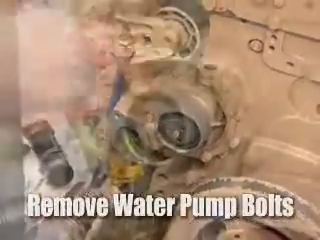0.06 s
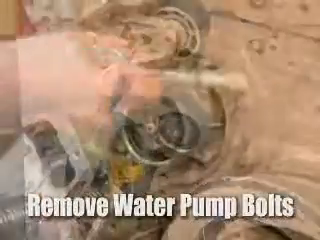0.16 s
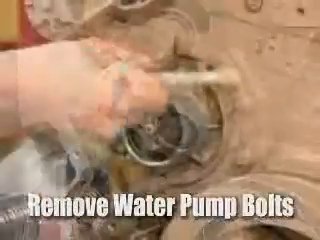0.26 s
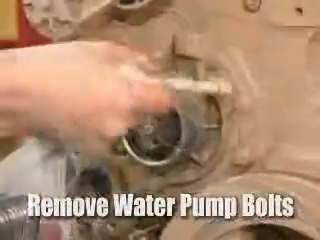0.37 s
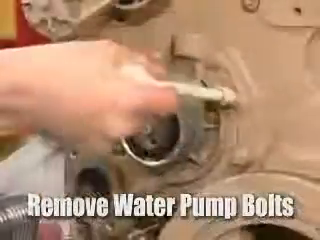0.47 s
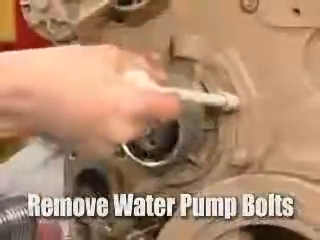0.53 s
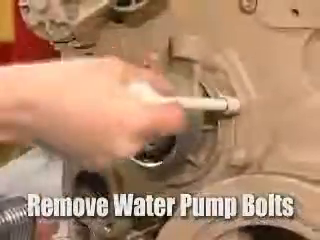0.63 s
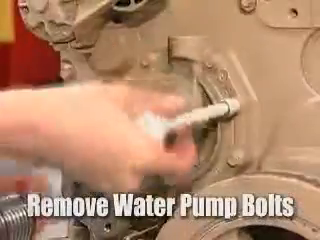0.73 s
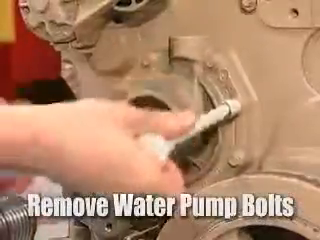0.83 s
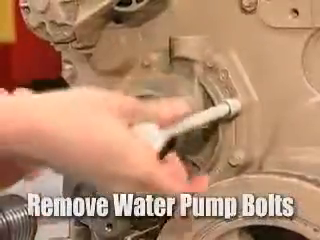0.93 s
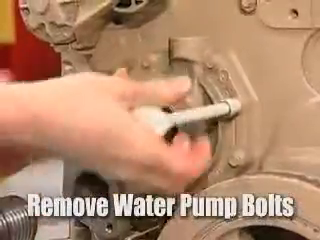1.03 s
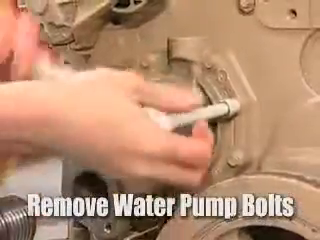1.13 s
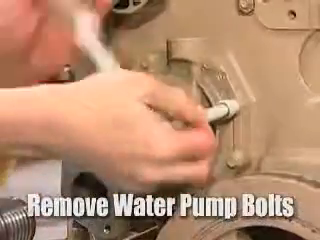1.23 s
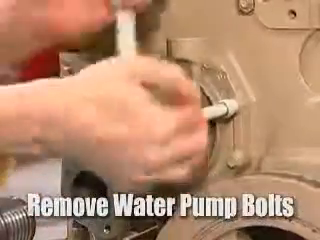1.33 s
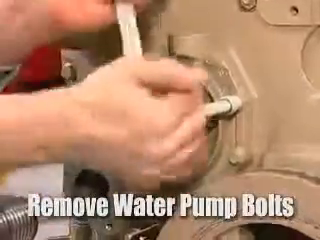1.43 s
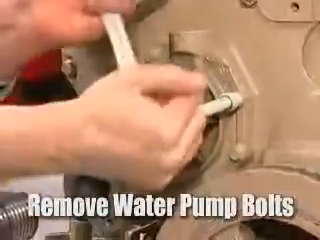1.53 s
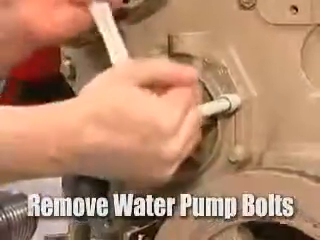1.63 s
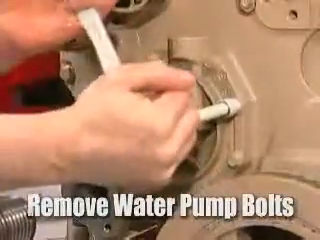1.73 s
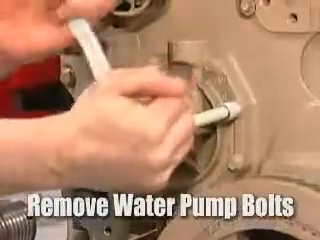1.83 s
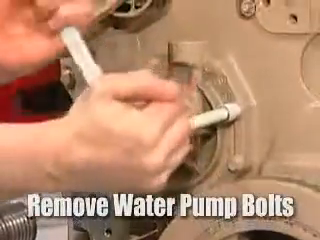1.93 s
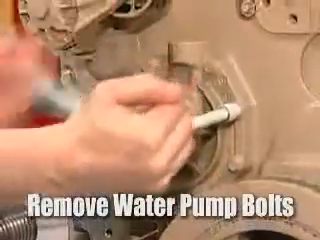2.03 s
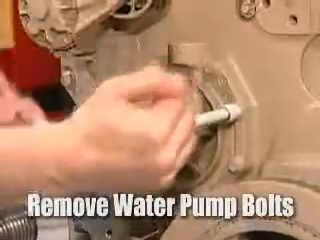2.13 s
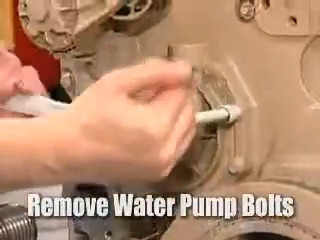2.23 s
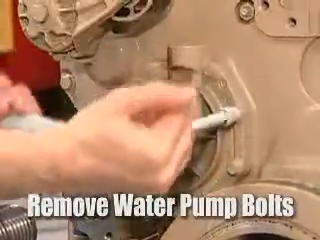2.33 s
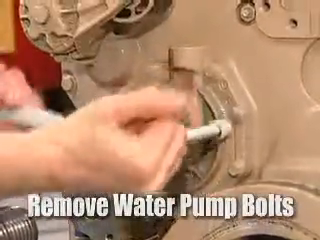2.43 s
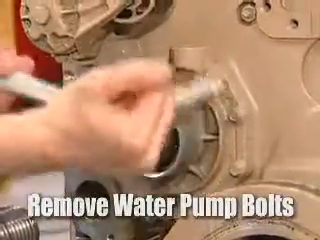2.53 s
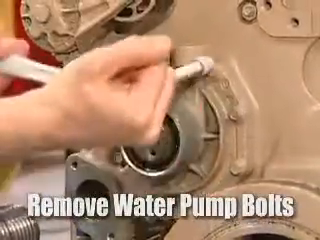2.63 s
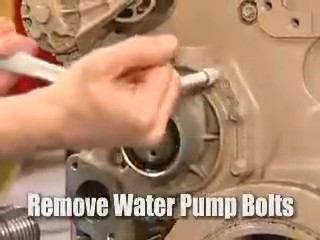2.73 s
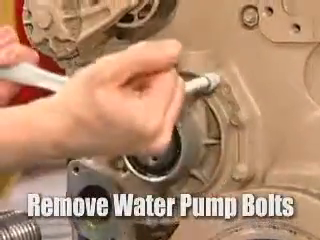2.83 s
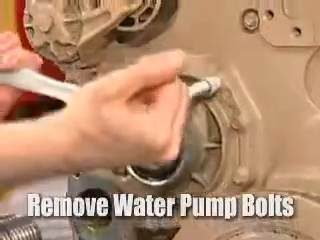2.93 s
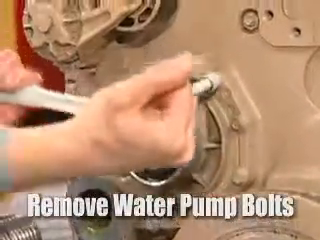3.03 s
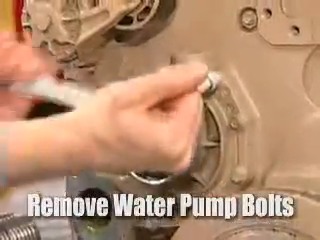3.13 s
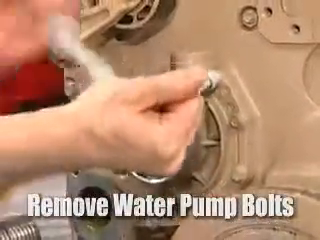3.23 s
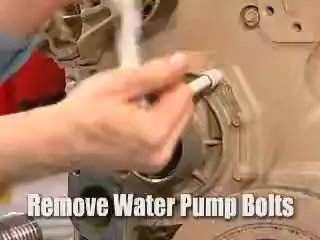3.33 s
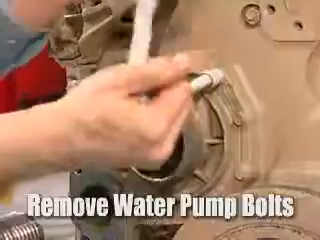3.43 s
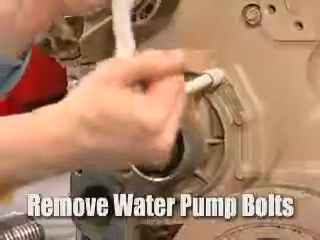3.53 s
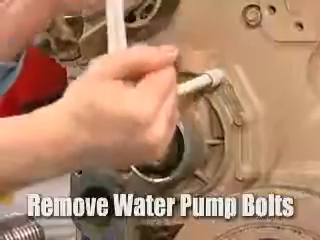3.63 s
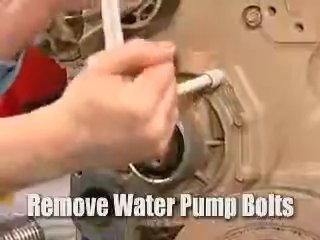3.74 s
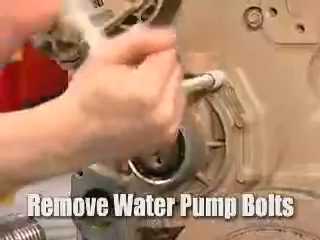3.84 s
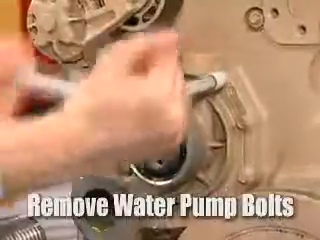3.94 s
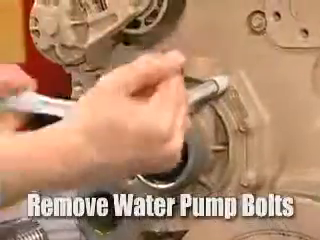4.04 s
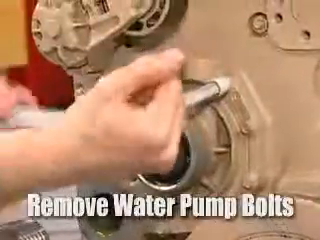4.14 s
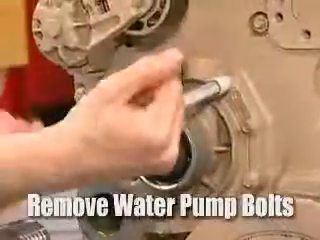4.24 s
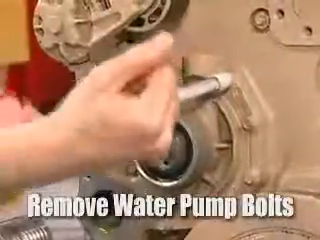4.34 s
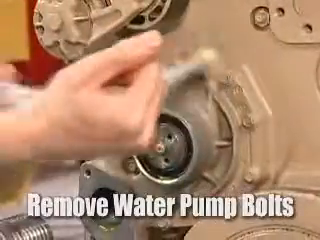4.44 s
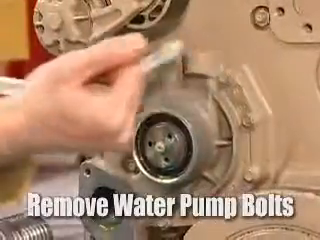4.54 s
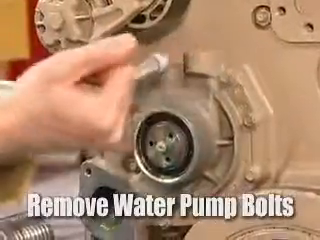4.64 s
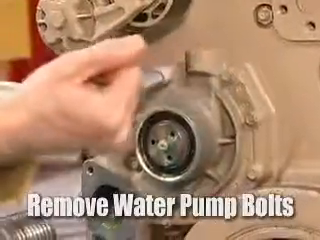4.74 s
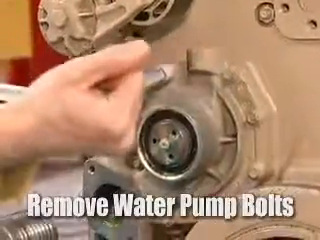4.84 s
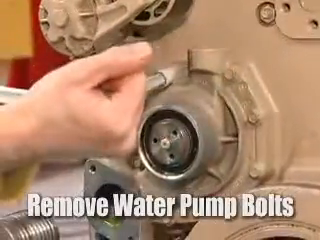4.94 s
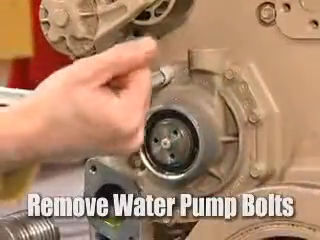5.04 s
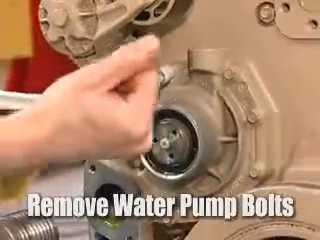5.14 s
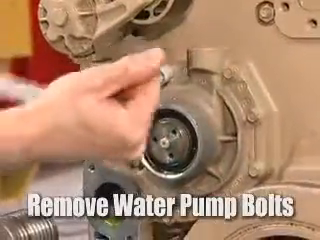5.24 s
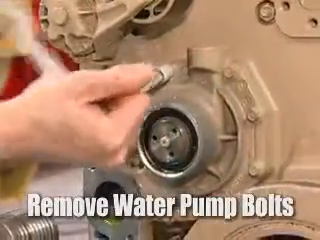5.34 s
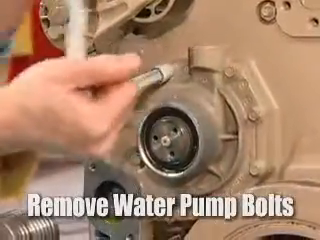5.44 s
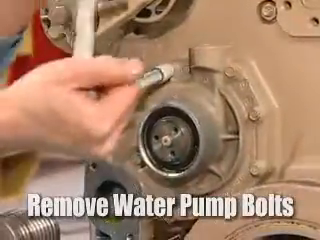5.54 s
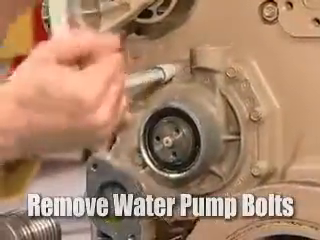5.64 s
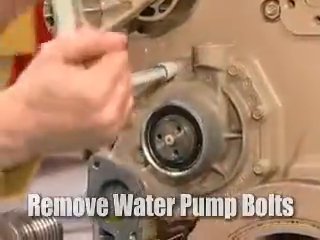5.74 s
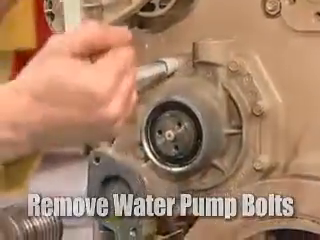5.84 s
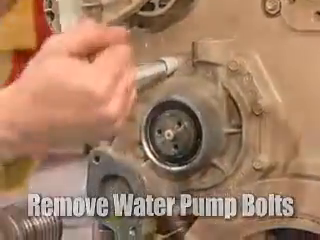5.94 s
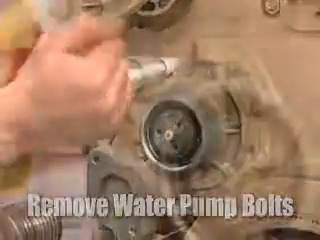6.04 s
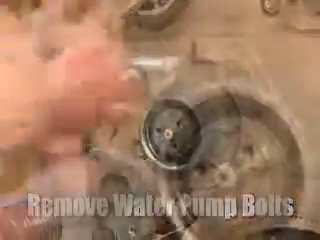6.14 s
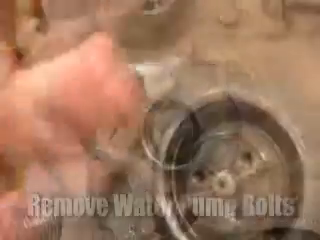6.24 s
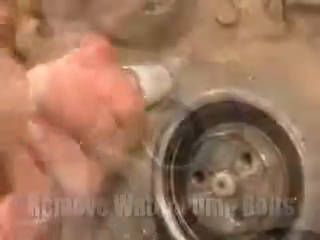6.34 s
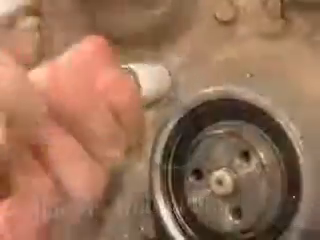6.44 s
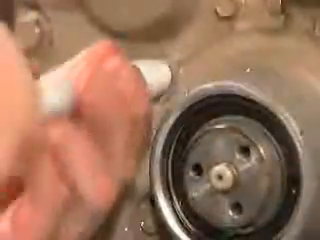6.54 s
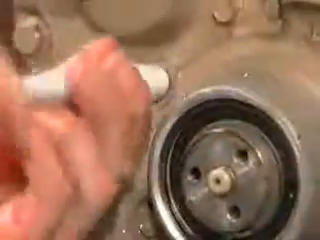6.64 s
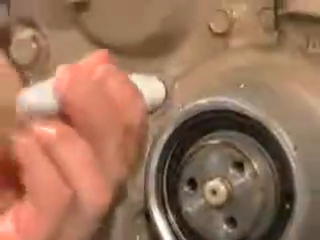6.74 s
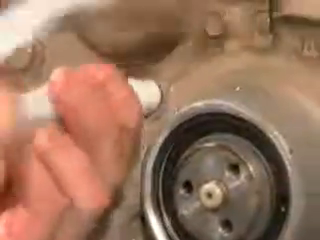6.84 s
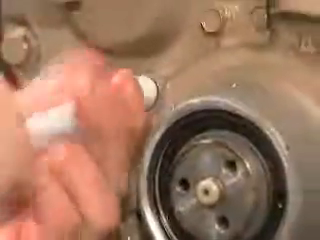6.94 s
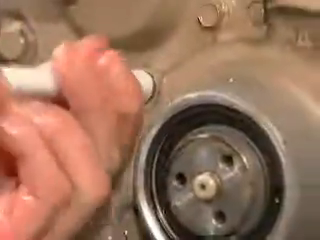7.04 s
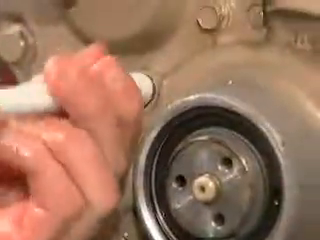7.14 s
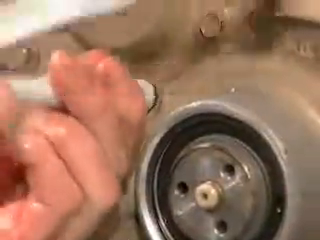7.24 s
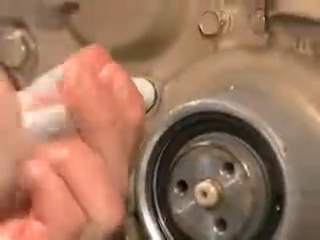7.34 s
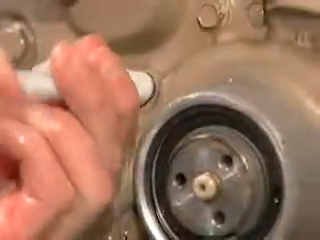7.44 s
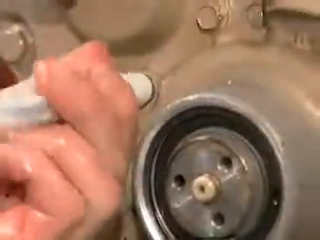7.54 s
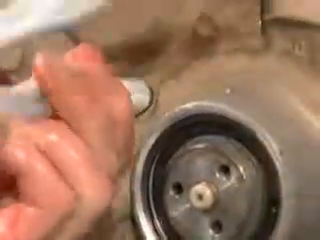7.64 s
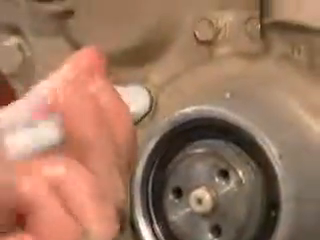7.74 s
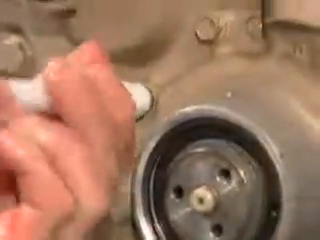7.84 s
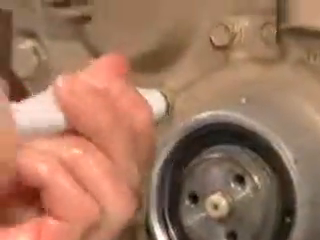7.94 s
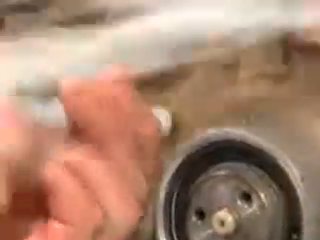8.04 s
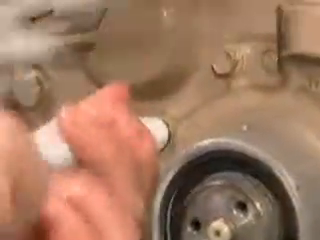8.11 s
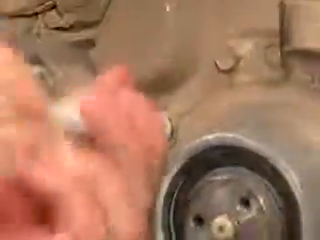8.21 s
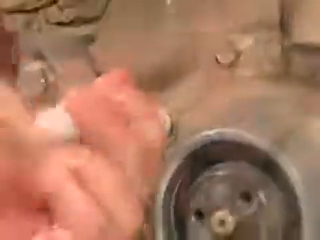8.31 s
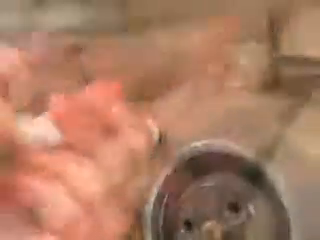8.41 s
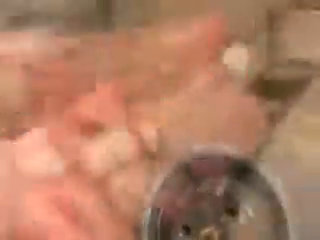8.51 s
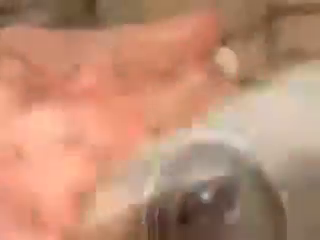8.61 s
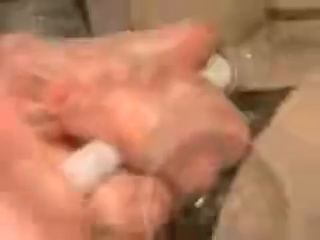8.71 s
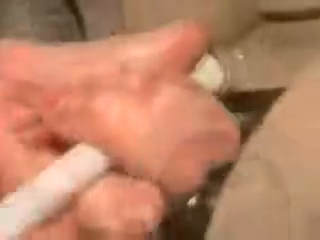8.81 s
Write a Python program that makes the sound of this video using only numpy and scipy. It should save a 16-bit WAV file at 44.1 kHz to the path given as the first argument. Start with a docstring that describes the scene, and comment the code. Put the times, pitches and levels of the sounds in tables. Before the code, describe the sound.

Close microphone, quiet workshop with low air rumble and soft hiss. First come small steel clinks, knocks and brief gritty rubs; then a ratchet wrench clicks slowly in three separate runs, broken by sharp heavy clunks that hum briefly in the casting. In the last third, rapid zipping bursts of clicks recur several times a second, loudest near eight seconds, mixed with light tool knocks and bassy bumps.

```python
"""A hand ratchet backs bolts out of an engine block in a workshop, over ventilation rumble (shaped noise).
Knocks and socket clinks come first: short forces ringing decaying modes; short rubs of gritty noise recur.
From 1.2 s come three runs of pawl clicks on the back swing, about two seconds apart, with hard knocks between.
From 6 s the clicks crowd into faster bursts, repeated until the end.
Clicks and knocks also send a bass pressure thump; decaying noise adds the room tail and the block's hum."""
import sys
import numpy as np
from scipy import signal
from scipy.fft import rfft, irfft
from scipy.io import wavfile
from scipy.ndimage import uniform_filter1d

SR = 44100
rng = np.random.default_rng(int(sys.argv[2]) if len(sys.argv) > 2 else 0)


def dump_mix(stems):
    """Bounce the given channels to the path in sys.argv[1] as a 16-bit WAV at rate SR."""
    frames = np.atleast_2d(stems).T  # one column per channel
    limited = np.clip(frames, -1, 1)  # hard clip at full scale
    pcm = np.round(limited * 32767).astype(np.int16)
    wavfile.write(sys.argv[1], SR, pcm)


N = 391166

# Spectrum of ventilation and microphone hiss: frequency_hz, relative density_db [dB per Hz]
AIR_SPECTRUM = [(12, -10), (20, 0), (55, 4), (72, -12), (103, -12), (150, -19.5), (281, -18), (412, -22),
                (655, -22.5), (1530, -35.5), (11200, -46.5), (12100, -42.5), (13500, -101)]
# Chance wavering of the rumble and airflow noise: time_s, rumble_db [rms], airflow_db [rms]
AIR_WAVERING = [(0.0, -48.5, -68), (0.49, -51, -58), (0.81, -54, -61.5), (1.33, -58, -65),
                (2.15, -53.5, -62), (2.49, -53.5, -62), (2.94, -54.5, -68), (3.98, -56, -65),
                (4.42, -57.5, -62), (5.34, -56, -67), (6.0, -56.5, -64), (6.55, -60.5, -64.5),
                (7.36, -56, -62.5), (8.15, -57, -62), (8.6, -56, -72.5), (8.87, -56, -69.5)]
# Workshop reverberation by band: low_hz, high_hz, relative level_db, t60_s
ROOM_BANDS = [(314, 5000, -25, 0.65), (1250, 2600, -29, 1), (3000, 5950, -29, 0.55),
              (6000, 8200, -21, 0.42), (9700, 11100, -15, 0.37)]
# Engine block humming on after a knock, clusters of close modes: low_hz, high_hz, relative level_db, t60_s
BLOCK_BANDS = [(930, 1180, -26, .5), (1600, 1900, -24.5, .6), (3300, 4600, -23, 0.75),
               (4750, 6200, -20.5, 0.65)]
# Steel sliding briefly over steel: start_s, fade_s, centre_hz, width_hz, level_db [rms before the envelope]
RUBS = [(0.26, 0.052, 624, 850, -48.5), (0.459, 0.053, 1980, 610, -61), (0.726, 0.043, 1720, 200, -58.5),
        (1.693, 0.028, 2950, 1200, -65.5), (4.408, 0.021, 4950, 900, -60.5),
        (4.49, 0.041, 1790, 397, -53.5), (4.677, 0.046, 2530, 415, -67.5), (4.733, 0.052, 2120, 694, -61.5),
        (5.811, 0.017, 3230, 504, -61.5), (6.419, 0.11, 2330, 607, -59.5), (6.458, 0.03, 5240, 500, -67),
        (6.784, 0.033, 4500, 3000, -61), (6.876, 0.037, 4470, 4000, -42.5), (7.309, 0.037, 4560, 4400, -44),
        (7.783, 0.019, 3900, 600, -53), (7.83, 0.014, 2620, 600, -57.5), (8.586, 0.027, 4960, 4960, -52)]
# Loose socket clinking on its extension bar: start_s, relative level_db
CLINKS = [(0.2639, -37.5), (0.5559, -66.5), (0.7294, -60.5)]
# Modes of the socket: frequency_hz, relative level_db, t60_s
SOCKET_MODES = [(1600, -18, 0.4), (3455, 14, 0.091), (3650, 10.5, 0.11), (3600, -31, 0.32),
                (3330, -18, 0.32), (8770, -16.5, 0.15), (10240, -15, 0.12)]
# Socket and handle meeting bolt and casting:
# start_s, level_db, centre_hz, bass_lean_db, treble_lean_db, thump_db
KNOCKS = [(0.261, -39, 3300, -16, -14.5, -38.5), (0.608, -51.5, 1900, 3, -21, -46),
          (0.642, -65, 3300, -15, -14, -60), (0.7, -47, 4670, -14, -8.5, -61),
          (0.719, -47.5, 1900, -4, -19, -66), (0.728, -40, 3000, -12, -40, -61),
          (0.884, -65, 3600, -2, -1, -67), (0.969, -69, 2000, 10, 7, -48),
          (1.1004, -49, 6400, -20, 6.5, -51), (1.553, -53, 1900, 9, -12, -51),
          (1.6075, -45.5, 6500, -27, -1, -44), (1.948, -67, 3300, 10, 4, -64),
          (1.9691, -24, 6040, -17, -15, -26), (2.084, -46.5, 6400, -17, -4, -72),
          (2.1077, -24, 4450, -8.5, -0.5, -23), (2.361, -47, 3750, -11.5, -33, -53),
          (2.489, -44, 3000, -30.5, -30, -60), (2.502, -35.5, 3300, -33, -8.5, -34),
          (2.756, -36, 3300, -16, -18, -40.5), (2.775, -42.5, 3100, -13, -32, -48),
          (2.8603, -50, 1880, -3.5, -34, -59), (3.0869, -61.5, 1890, 20, -24, -50),
          (3.0982, -41, 3100, -0.5, -9.5, -42), (3.243, -56, 2500, 0, -10, -49),
          (3.8754, -20, 4700, -16.5, -13.5, -25.5), (3.912, -19.5, 6000, -16, -10.5, -21.5),
          (4.5, -46.5, 3100, -9, -18, -47), (4.535, -54.5, 1900, 2.5, -31.5, -62),
          (4.9715, -45.5, 1930, 1, -26, -60), (5.0549, -50.5, 6350, 3, 3.5, -49),
          (5.1763, -41.5, 1900, 0.5, -15, -49), (5.732, -42, 2300, -11, -4, -55),
          (5.741, -37.5, 4600, 2.5, -5.5, -35.5), (6.1171, -26, 4840, -20.5, -23, -40),
          (6.1473, -28, 5330, -14.5, -8, -28.5), (6.326, -49.5, 6400, -22, -0.5, -50),
          (6.38, -59, 6400, -11, -9, -73), (6.598, -54, 2000, -13, -15, -72),
          (6.7193, -55, 3300, -12, -13, -51), (6.792, -46.5, 5500, -21, -2, -54),
          (7.042, -56.5, 6340, -10, -19, -66), (7.115, -51, 3300, -4, -19, -83),
          (7.1938, -55, 6460, 1, -3, -69), (7.5394, -45, 4700, -12, 4.5, -37),
          (7.595, -48.5, 6400, -26, -1.5, -64), (7.605, -56, 6400, -21, -2, -62),
          (7.62, -47.5, 5500, -19, -12, -66), (7.797, -65, 4300, -13, -5, -64),
          (7.935, -42.5, 3300, -17, -7, -42), (7.939, -43.5, 3000, -12, -3.5, -62),
          (7.978, -45, 3300, -16, -15, -45), (8.0006, -49, 4700, -8, 2, -43.5),
          (8.0303, -46, 5000, -7, 3, -41.5), (8.21, -43.5, 4000, -13, -17, -68),
          (8.231, -43, 3300, -14, 0, -58), (8.267, -52, 3600, -5.5, -8, -69),
          (8.5277, -35, 3300, -13, 3, -25.5), (8.63, -56, 3600, -11, -6, -68),
          (8.694, -57.5, 6400, -25.5, -4, -42), (8.8, -38, 3600, -20, -9, -41.5)]
# Bands of a knock: low_hz, high_hz
KNOCK_BANDS = [(4000, 5500), (400, 950), (950, 1300), (1300, 2700), (2700, 4000), (5500, 7500),
               (7500, 10000), (10000, 13500)]
# Colour shared by all knocks: relative level_db in each knock band
KNOCK_COLOUR_DB = [-0.29, 1.4, -3.3, -1.8, -0.29, 1.3, -2, 1.8]
# Modes of the casting: frequency_hz, relative level_db, t60_s
CASTING_MODES = [(1058, 4, .07), (1750, -8, .03), (2880, -13, .015), (3540, -5, .025), (4240, -5, .018),
                 (4960, -4, .022), (5700, -10, .012), (6350, -9, .01), (7150, -11, .012), (7950, -11, .012),
                 (10700, -12, .012)]
# Pawl dropping over a gear tooth: start_s, level_db
CLICKS = [(1.2153, -36), (1.254, -35), (1.2892, -30), (1.3207, -29), (1.3538, -31.5), (1.3832, -26.5),
          (1.4167, -30.5), (1.4513, -31), (3.3184, -34), (3.3479, -31.5), (3.3733, -28.5), (3.3972, -30.5),
          (3.4196, -29), (3.441, -31), (3.464, -27), (3.489, -28.5), (3.5303, -29), (5.4005, -30),
          (5.4278, -29), (5.4528, -30.5), (5.4738, -29), (5.4953, -32.5), (5.5176, -28.5), (5.5407, -32.5),
          (5.566, -31.5), (5.6019, -31.5), (5.9998, -47), (6.0112, -39.5), (6.0245, -43), (6.0352, -44),
          (6.0472, -38), (6.058, -40), (6.0654, -39), (6.0756, -35), (6.0845, -37), (6.0936, -40),
          (6.1042, -31), (6.4116, -33), (6.4237, -31), (6.4335, -34), (6.4442, -27), (6.4524, -31),
          (6.4616, -33), (6.4698, -33), (6.4817, -30.5), (6.4924, -43), (6.5038, -42), (6.514, -34),
          (6.526, -43), (6.535, -32), (6.5535, -32.5), (6.8166, -28), (6.8281, -26), (6.8387, -19.5),
          (6.8466, -25), (6.8552, -25), (6.8645, -25), (6.872, -27), (6.8813, -32), (6.8882, -25),
          (6.9002, -34), (6.9076, -24.5), (6.9186, -26), (6.9316, -34), (6.949, -33.5), (7.2122, -29),
          (7.2253, -28.5), (7.238, -28), (7.2472, -24), (7.2575, -26.5), (7.2657, -25), (7.274, -25),
          (7.2844, -29), (7.2909, -22.5), (7.299, -28), (7.3063, -28), (7.3225, -39), (7.3476, -41),
          (7.3722, -49), (7.6787, -25.5), (7.6876, -23.5), (7.6965, -19.5), (7.705, -22.5), (7.7131, -22),
          (7.723, -25), (7.7307, -19), (7.7409, -24), (7.7546, -26.5), (7.7682, -31), (8.0351, -22.5),
          (8.0489, -23), (8.074, -24.5), (8.0816, -21.5), (8.091, -22), (8.0995, -20.5), (8.1063, -24),
          (8.1142, -17), (8.1222, -17.5), (8.1291, -26), (8.1378, -18), (8.1478, -30), (8.1584, -30),
          (8.171, -26), (8.4093, -45.5), (8.4155, -38.5), (8.4257, -45), (8.4338, -38.5), (8.444, -39),
          (8.4528, -33.5), (8.461, -34.5), (8.4682, -32.5), (8.4747, -32), (8.4831, -28.5), (8.4914, -31),
          (8.5001, -31), (8.5096, -28.5), (8.521, -28), (8.53, -36), (8.5323, -38), (8.5408, -31),
          (8.5517, -29), (8.5647, -30.5), (8.5846, -29), (8.6022, -35), (8.819, -29), (8.8292, -27),
          (8.8387, -26), (8.847, -21.5), (8.8538, -24.5), (8.8614, -24.5)]
# Bands of a click: low_hz, high_hz
CLICK_BANDS = [(4500, 8500), (2000, 4500), (8500, 10500), (10500, 13500), (500, 2000)]
# Colour of a click, one row per stretch of clicks: relative level_db in each click band
CLICK_COLOUR_DB = [(-6, -15.5, -10.5, -8, -16.5), (-9.5, -13, -8, -9.5, -25), (-6, -10, -11, -6, -24)]
# Modes of the ratchet head: frequency_hz, relative level_db, t60_s
HEAD_MODES = [(1060, -6, .03), (2250, -10, .01), (5250, -6, .014), (6000, -6, .014), (7000, -10, .01),
              (12450, -7, .01)]
# Two modes that differ between three stretches of clicks (slow, fast, last): start_s, handle mode, pawl mode;
# each mode is (frequency_hz, relative level_db, t60_s)
STRETCHES = [(0, (3670, -8, .012), (9730, 2, .02)), (5.9, (3890, -4, .01), (9460, 4, .011)),
             (8.3, (2950, 1, .01), (9500, 0, .011))]
# Thump of a click relative to the click, one value per stretch of clicks: level_db
CLICK_THUMP_DB = [-18.5, -19, -20.5]


def amp(db):
    """Decibel law: the amplitude gain of a level in dB."""
    return 10 ** (np.asarray(db) / 20)


def band(x, low_hz, high_hz):
    """Band limitation by a Butterworth filter."""
    return signal.sosfilt(signal.butter(2, [low_hz, high_hz], "bandpass", fs=SR, output="sos"), x)


def place(times, gains, shapes):
    """Superposition: one short shape per event is added to the time line."""
    out = np.zeros(N + shapes.shape[1])
    for start_s, gain, shape in zip(times, gains, shapes):
        i = int(start_s * SR)
        out[i:i + len(shape)] += gain * shape
    return out[:N]


def air():
    """Turbulence noise: low rumble and airflow, each wavering by chance, over a steady hiss."""
    hz = np.maximum(np.arange(N // 2 + 1) * SR / N, 1)
    spectrum_hz, spectrum_db = np.transpose(AIR_SPECTRUM)
    tone = amp(np.interp(np.log(hz), np.log(spectrum_hz), spectrum_db))
    time_s, rumble_db, airflow_db = np.transpose(AIR_WAVERING)
    t = np.arange(N) / SR
    layers = [(hz < 90, np.interp(t, time_s, rumble_db)),
              ((hz >= 90) & (hz < 1500), np.interp(t, time_s, airflow_db)),
              (hz >= 1500, -76.5)]  # hiss, dB rms
    out = np.zeros(N)
    for part, level_db in layers:
        noise = irfft(rfft(rng.standard_normal(N)) * tone * part, N)
        out += amp(level_db) * noise / noise.std()
    return out


def reverberate(x, bands):
    """Exponential decay of dense echoes or close modes, each band at its own pace."""
    t = np.arange(int(0.8 * SR)) / SR
    build = np.clip((t - 0.003) / 0.0062, 0, 1)
    tail = np.zeros(len(t))
    for low_hz, high_hz, level_db, t60_s in bands:
        decay = amp(level_db - 60 * t / t60_s)
        tail += decay * band(rng.standard_normal(len(t)), low_hz, high_hz)
    return signal.fftconvolve(x, build * tail / 10)[:N]


def rubs():
    """Stick-slip friction: gritty grains in a broad resonance, quick to start and fading."""
    size = SR // 5
    out = np.zeros(N + SR)
    # unevenness in dB, smoothed over 60 samples and restored to its original spread
    gusts = uniform_filter1d(rng.standard_normal(N + SR), size=60) * np.sqrt(60)
    grit = rng.standard_normal(N + SR) * amp(1.9 * gusts)
    for start_s, fade_s, centre_hz, width_hz, level_db in RUBS:
        i = int(start_s * SR)
        age = np.arange(size) / SR / fade_s
        scrape = band(grit[i:i + size], max(centre_hz - width_hz / 2, 100), centre_hz + width_hz / 2)
        envelope = (1 - np.exp(-age / 0.036)) * np.exp(-age ** 2)
        out[i:i + size] += amp(level_db) * scrape / scrape.std() * envelope
    return out[:N]


def ring(force, hz, t60_s):
    """Damped resonance: one complex pole turns a force into a decaying sine."""
    pole = np.exp(2j * np.pi * hz / SR - np.log(1000) / (t60_s * SR))
    return signal.lfilter([1], [1, -pole], force + 1e-18).imag / 12


def clinks():
    """Beating of close modes: a tap on the thin socket wall rings them, building over a few ms."""
    start_s, level_db = np.transpose(CLINKS)
    tap = place(start_s, amp(level_db), np.ones((len(start_s), 1)))
    dip = np.tile(np.exp(-np.arange(400) / 60), (len(start_s), 1))
    dips = uniform_filter1d(place(start_s, np.ones(len(start_s)), dip), size=3)
    build = np.clip(1 - dips, 0, 1)
    return 9 * build * sum(amp(db) * ring(tap, hz, t60_s) for hz, db, t60_s in SOCKET_MODES)


def contact_forces(count, rise_s, fall_s, rattle_db, rattle_s):
    """Impact force: a quick crack with an even spectrum, and a separate rattle of settling parts."""
    t = np.arange(2400) / SR
    rise = (t / rise_s) ** 2 / (1 + (t / rise_s) ** 2)
    noise = rise * rng.standard_normal((count, len(t)))
    spectrum = rfft(noise * np.exp(-t / fall_s))
    mean = np.sqrt(np.mean(np.abs(spectrum) ** 2, axis=1, keepdims=True))
    even = irfft(spectrum * mean / np.abs(spectrum), len(t))  # phases stay, magnitudes become flat
    crack = even * rise * np.exp(-t / (4 * fall_s))
    rattle = noise * amp(rattle_db) * np.exp(-t / rattle_s)
    return np.array([crack, rattle])


def ring_each(force, hz, level_db, t60_s):
    """Modal participation: every blow excites the mode by a share that varies around its usual one."""
    tone = ring(force, hz, t60_s)
    scatter_db = 6 * rng.standard_normal((force.shape[1], 1))
    share = amp(level_db - 8 + scatter_db)
    return share * tone / np.abs(tone.sum(axis=0)).max(axis=1, keepdims=True)


def strike(times, band_db, bands, modes, crack_db, mode_db_per_db, **contact):
    """Modal excitation: each band holds contact noise and modes, at a set peak; rows: crack, rattle."""
    out = np.zeros((2, N))
    strongest_db = band_db.max(axis=1, keepdims=True)
    # light blows excite the modes a little less
    reach = amp(mode_db_per_db * (strongest_db - strongest_db.max()))
    for k, (low_hz, high_hz) in enumerate(bands):
        force = contact_forces(len(times), **contact)
        inside = [mode for mode in modes if low_hz <= mode[0] < high_hz]
        body = reach * sum(ring_each(force, *mode) for mode in inside)
        noise = amp(crack_db) * np.sqrt(SR / 8 / (high_hz - low_hz)) * force
        blows = band(noise + body, low_hz, high_hz)
        gain = amp(band_db[:, k]) / np.abs(blows.sum(axis=0)).max(axis=1)
        out += np.array([place(times, gain, part) for part in blows])
    return out


def thumps(times, level_db, push_s):
    """Pressure pulse: a brief suction at the microphone swings back through its bass resonance."""
    t = np.arange(600) / SR
    suction = -t / push_s * np.exp(1 - t / push_s)
    w, damping = 2 * np.pi * 42, np.log(1000) / 0.1  # 42 Hz resonance, T60 0.1 s
    bass = signal.bilinear([1, 0, 0], [1, 2 * damping, w ** 2 + damping ** 2], SR)
    pulses = place(times, amp(level_db), np.tile(suction, (len(times), 1)))
    return signal.lfilter(*bass, pulses + 1e-18)


def knocks():
    """Forced vibration of the casting: band levels lean from each knock's centre to bass and treble."""
    start_s, level_db, centre_hz, bass_db, treble_db, thump_db = np.transpose(KNOCKS)
    log_mids = np.log(np.prod(KNOCK_BANDS, axis=1)) / 2
    # the full bass lean is reached at 800 Hz, the full treble lean at 10 kHz
    lean_db = np.array([np.interp(log_mids, np.log([800, centre, 10000]), [bass, 0, treble])
                        for bass, centre, treble in zip(bass_db, centre_hz, treble_db)])
    band_db = level_db[:, None] + lean_db + KNOCK_COLOUR_DB
    body = strike(start_s, band_db, KNOCK_BANDS, CASTING_MODES, crack_db=4.5, mode_db_per_db=0.08,
                  rise_s=0.00019, fall_s=0.0026, rattle_db=-2.5, rattle_s=0.0093)
    return body, thumps(start_s, thump_db, push_s=0.00059)


def ratchet():
    """Impact of pawl on tooth: clicks ring head, handle and pawl, and each tooth's colour differs."""
    start_s, level_db = np.transpose(CLICKS)
    stretch = np.searchsorted([row[0] for row in STRETCHES], start_s, side="right") - 1
    usual_db = level_db[:, None] + np.array(CLICK_COLOUR_DB)[stretch]
    band_db = usual_db + 3 * rng.standard_normal(usual_db.shape)
    # colour changes from tooth to tooth, while the summed band power stays
    usual_power = np.sum(amp(usual_db) ** 2, axis=1)
    power = np.sum(amp(band_db) ** 2, axis=1)
    band_db += 10 * np.log10(usual_power / power)[:, None]

    clicks = np.zeros((2, N))
    for k, (_, handle_mode, pawl_mode) in enumerate(STRETCHES):
        inside = stretch == k
        modes = HEAD_MODES + [handle_mode, pawl_mode]
        clicks += strike(start_s[inside], band_db[inside], CLICK_BANDS, modes,
                         crack_db=10.5, mode_db_per_db=0.046,
                         rise_s=0.00049, fall_s=0.00096, rattle_db=-23, rattle_s=0.0099)

    # a longer wait before a click gives a stronger thump: 6.5 dB per doubling
    usual_gap_s, longest_gap_s = 0.011, 0.03
    gap_s = np.clip(np.diff(start_s, prepend=0), 1 / SR, longest_gap_s)
    wait_db = 6.5 * np.log2(gap_s / usual_gap_s)
    scatter_db = 2.5 * rng.standard_normal(len(start_s))
    thump_db = level_db + np.array(CLICK_THUMP_DB)[stretch] + wait_db + scatter_db
    return clicks, thumps(start_s, thump_db, push_s=0.00053)


def scene():
    """Direct and reverberant sound: rattles, thumps and air stay dry, all else also feeds the room."""
    rub, clink = rubs(), clinks()
    knock, knock_thump = knocks()
    click, click_thump = ratchet()
    # row 0 is the crack with its ringing, row 1 the rattle with its own
    room_send = click[0] + amp(8.5) * knock[0] + amp(-4.5) * clink + rub
    echo = reverberate(room_send, ROOM_BANDS)
    block_hum = reverberate(knock[0], BLOCK_BANDS)
    direct = rub + clink + knock.sum(axis=0) + click.sum(axis=0)
    return (air() + echo + block_hum + direct + knock_thump + click_thump)[None]


def record(dry):
    """Band limitation of the recorder: a steep elliptic low-pass at 12.8 kHz."""
    return signal.sosfilt(signal.ellip(8, 0.5, 40, 12800, fs=SR, output="sos"), dry)


dry = scene()
out = record(dry)
dump_mix(out)
```